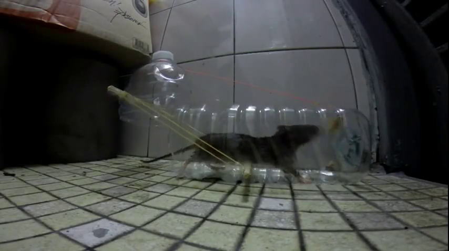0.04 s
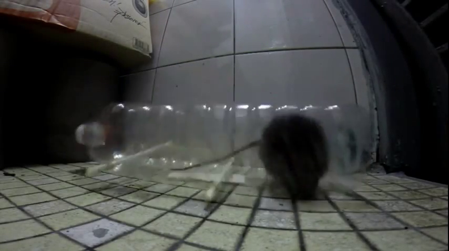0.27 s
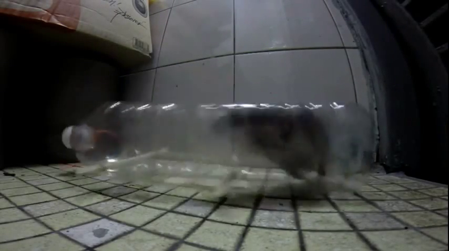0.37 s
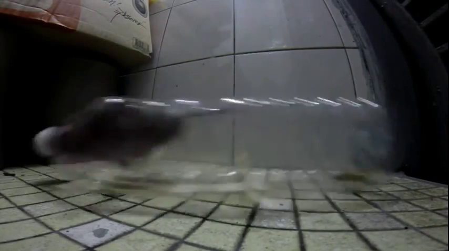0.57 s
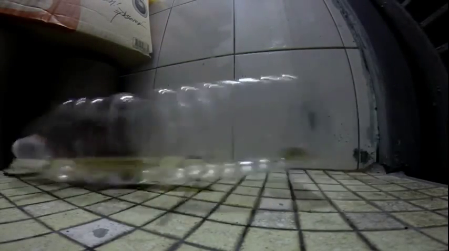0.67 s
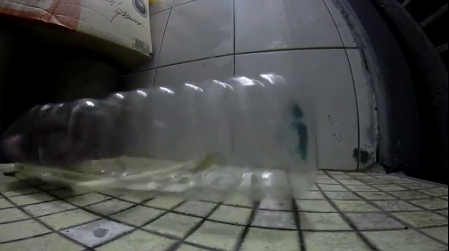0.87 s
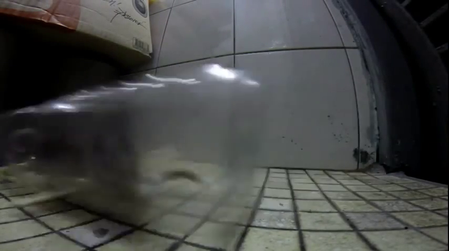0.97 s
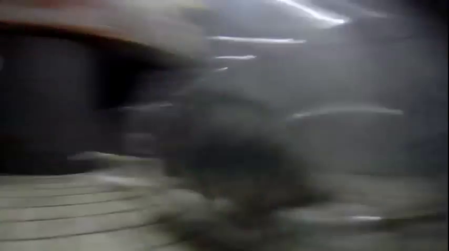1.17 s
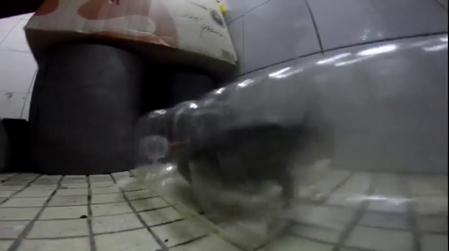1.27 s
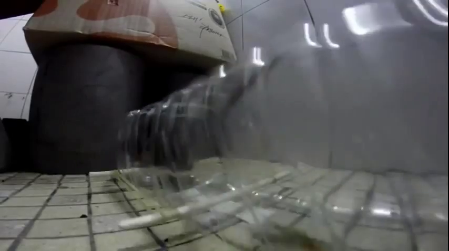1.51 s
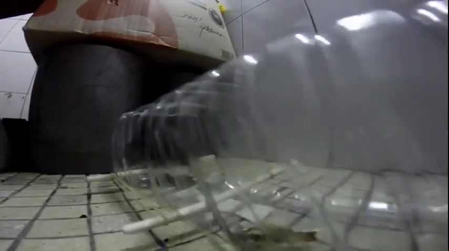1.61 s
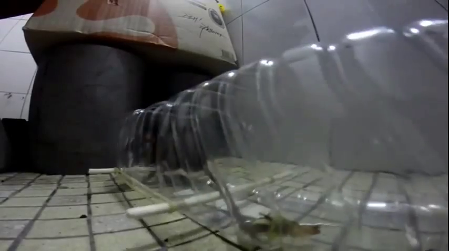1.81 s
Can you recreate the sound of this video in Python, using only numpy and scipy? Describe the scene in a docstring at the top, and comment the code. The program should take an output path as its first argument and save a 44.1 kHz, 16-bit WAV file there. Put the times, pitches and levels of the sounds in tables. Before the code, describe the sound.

A plastic bottle trap snaps shut, then knocks and crackles as a rat thrashes inside.

```python
"""Over a low drone and a faint whine, a plastic bottle trap slaps shut on a tiled floor.
The rat inside thrashes and rolls it: the thin wall knocks, buckles with sharp snaps and
crackles under the claws, while the bottle rings faintly and the small tiled room echoes.
At about 1.3 s the bottle skids with one squeak. The last knocks die away into a soft hiss
and a thin, high whine."""
import sys
import numpy as np
from scipy import signal
from scipy.fft import rfft, irfft, next_fast_len
from scipy.io import wavfile
from scipy.ndimage import map_coordinates

SR = 44100
rng = np.random.default_rng(int(sys.argv[2]) if len(sys.argv) > 2 else 0)


def materialize(psi):
    """Save the field psi as 16-bit PCM at rate SR to the path in sys.argv[1].

    A 1-D psi becomes a single channel; in a 2-D psi each row is a channel.
    """
    bounded = np.clip(np.atleast_2d(psi).T, -1, 1)
    quanta = np.round(bounded * 32767).astype(np.int16)
    wavfile.write(sys.argv[1], SR, quanta)


N = 81585
TIME = np.arange(N) / SR
TAIL = np.arange(SR // 3) / SR  # the clock for one short sound, in seconds

# The plastic has a low "body", a middle "crack" and a high "fizz". Each tone colour: f/Hz, level/dB
BODY = [(60, -37.5), (160, -23.5), (400, -11), (620, -3), (1000, -1), (1200, -3.5), (1450, -14.5),
        (2200, -40)]
CRACK = [(900, -15.5), (1500, -3.5), (2000, 1.5), (2700, -5), (3300, -4), (4000, -14), (6000, -36.5)]
FIZZ = [(2600, -29), (4000, 1.5), (6200, -6), (7200, -10.5), (10500, -19.5), (15000, -35)]
# The sharper fizz of a buckling panel: f/Hz, level/dB
SNAP_FIZZ = [(2600, -46), (4200, 9), (15000, -24)]
# The rumble of the hollow inside: f/Hz, level/dB
HOLLOW = [(30, -34), (70, -16.5), (150, -2), (225, 3), (335, -2.5), (450, -8), (700, -26.5)]
# Paws and sticks hit the wall: t/s, body level/dB, crack over body/dB, fizz over body/dB, panel f/Hz
KNOCKS = [(0.233, -18, -25, -18.5, 898), (0.2389, -16, -9, -26, 924), (0.295, -16, -8, -25, 954),
          (0.304, -16.5, -17, -12.5, 1035), (0.388, -23, -8, -23, 802), (0.416, -23, -5, -27, 927),
          (0.453, -19, -11, -16, 1028), (0.486, -42, 11.5, 8, 1248), (0.523, -21.5, -7.5, -23, 1117),
          (0.538, -31, -9, -29, 1090), (0.569, -23.5, -7, -22.5, 584), (0.644, -23.5, -10.5, -17, 923),
          (0.665, -21, -11, -8.5, 1167), (0.712, -20, -8.5, -15.5, 971), (0.755, -24.5, 0.5, -11.5, 918),
          (0.787, -21.5, -14, -33, 940), (0.817, -28.5, -7, -10, 733), (0.846, -24, -11, -13.5, 758),
          (0.857, -18.5, -8.5, -26, 1110), (0.907, -21.5, -10, -34, 692), (0.945, -33.5, 7.5, -21, 1047),
          (0.961, -26, -3.5, -17, 980), (1.018, -24, -11, -23, 942), (1.035, -44.5, 6, 6, 1130),
          (1.061, -23.5, -5, -36, 770), (1.112, -23.5, 1, -24, 900), (1.214, -13.5, -30, -28, 912),
          (1.233, -24, -3.5, -5, 1207), (1.272, -18, -10.5, -20, 1103), (1.503, -21, -8.5, -14.5, 905),
          (1.581, -22, -5.5, -22, 1118), (1.671, -42.5, 3.5, -22, 1005)]
# The wall buckles: t/s, body level/dB, crack over body/dB, fizz over body/dB, panel f/Hz,
# ping f/Hz, ping level/dB
SNAPS = [(0.2721, -15.5, 0, -10.5, 694, 3240, -3.5), (0.875, -19, -2.5, -21.5, 884, 2265, -10.5),
         (1.082, -21, -9.5, -41, 876, 1500, -6.5), (1.293, -10, -13.5, -21.5, 870, 1760, -10),
         (1.3061, -13.5, -8, -10.5, 545, 4685, -10.5), (1.4128, -13.5, -7, -12.5, 703, 4680, -11.5),
         (1.5451, -12.5, -5, -23, 1114, 2363, -6)]
# Fading notes, mostly heavy bumps of the bottle; the one at 1.546 s sounds with the last snap: t/s, f/Hz,
# level/dB, t60/s (t60 is the time to fade by 60 dB)
BUMPS = [(0.2405, 325, 0.5, 0.062), (0.273, 135, -5, 0.058), (.296, 336.5, -19.5, 0.31),
         (0.572, 70, -24.5, 0.094), (0.689, 210, -19.5, 0.16), (0.941, 317.5, -20.5, 0.22),
         (1.21, 244, -6, 0.048), (1.213, 92.5, -20, 0.11), (1.499, 63, -21, 0.074),
         (1.502, 328.6, -21.5, 0.21), (1.546, 651, -13, 0.058), (1.7203, 779, -11, 0.021),
         (1.721, 718, -27.5, 0.2)]
# How hard the rat scrabbles: t/s, wall level/dB, claw level/dB
SCRABBLE = [(.22, -36, -44), (.29, -24, -25), (.36, -28.5, -45), (.65, -35, -36.5), (.68, -19.5, -26.5),
            (.74, -32.5, -42), (.86, -31, -37), (.965, -27.5, -39.5), (.985, -57, -52),
            (1.05, -32.5, -42.5), (1.08, -23, -30.5), (1.2, -20, -28.5), (1.26, -36.5, -37.5),
            (1.41, -31, -34), (1.49, -26.5, -40), (1.65, -55.5, -44.5), (1.85, -61.5, -63)]
# The skid, with one slip per cycle: t/s, f/Hz, level/dB
SKID = [(1.324, 359, -27), (1.351, 406.9, -19), (1.371, 427.1, -18), (1.39, 432.5, -15),
        (1.412, 423, -21.5), (1.43, 391, -30.5), (1.47, 366, -30.5)]
# The tones inside the squeak: multiple of the slip rate, level/dB
SKID_TONES = [(1, 3), (2, 1), (3, -13), (3.6, -1.5), (5, -7)]
# The notes the bottle rings with: f/Hz, level/dB, t60/s
BOTTLE_NOTES = [(236.5, -14.5, 0.19), (322.5, -1, 0.11), (696, -10.5, 0.2), (1170, -10.5, 0.2),
                (2174, -9, 0.18)]
# How long the room echoes: f/Hz, t60/s
ROOM_DECAY = [(100, 0.45), (2000, 0.33), (12000, 0.52)]
# Tone colour of the steady room noise: f/Hz, level/dB
ROOM_NOISE = [(22, -14), (36, -4), (55, -12.5), (200, -10.5), (450, -20.5), (1050, -23.5), (2000, -37.5),
              (15000, -60.5)]
# Tone colour of the closing hiss: f/Hz, level/dB
HISS = [(2000, -24), (6000, 2), (10500, -0.5), (14000, -20)]


def amp(db):
    """Turn decibels into a number to multiply by."""
    return 10 ** (np.asarray(db) / 20)


def unit(x):
    """Scale a signal so that its average power is 1."""
    return x / np.sqrt(np.mean(x ** 2) + 1e-20)


def along(points, hz):
    """Read between the rows of a frequency table, on a log frequency scale."""
    freqs, values = np.transpose(points)
    return np.interp(np.log(hz + 1), np.log(freqs + 1), values)


def curves(rows):
    """Join the rows of a time table with straight lines, one curve per column."""
    times, *columns = np.transpose(rows)
    return [np.interp(TIME, times, column) for column in columns]


def wobble(rate):
    """A smooth curve through `rate` random values a second."""
    return map_coordinates(rng.standard_normal(4096), [TIME * rate], mode="wrap")


def add(out, start_s, x):
    """Mix x into out, beginning at start_s."""
    part = out[max(round(start_s * SR), 0):][:len(x)]
    part += x[:len(part)]


def colour(x, points, size=4096):
    """Filter x to a tone colour, fading out the treble above the table's last row."""
    hz = np.fft.rfftfreq(size, 1 / SR)
    gain = amp(along(points, hz)) / np.maximum(hz / points[-1][0], 1) ** 4
    # Folding the cepstrum (the log gain, transformed) keeps the filter from sounding before a hit.
    cepstrum = irfft(np.log(gain))
    cepstrum[1:size // 2] *= 2
    cepstrum[size // 2 + 1:] = 0
    response = irfft(np.exp(rfft(cepstrum)))
    return signal.fftconvolve(x, response)[:len(x)]


def note(hz, db, t60, attack_s):
    """One vibration that swells quickly and dies away."""
    return -amp(db - 60 * TAIL / t60) * np.sin(2 * np.pi * hz * TAIL) * (1 - np.exp(-TAIL / attack_s))


def blows(rows, fizz, t60, push, spiky_db, energy_s, rise_s):
    """Each blow is one push and a dying crinkle; the fizz builds as the contact slides."""
    out = np.zeros(N)
    for start, db, crack_db, fizz_db, *_ in rows:
        for spectrum, level in (BODY, db), (CRACK, db + crack_db), (fizz, db + fizz_db):
            noise, sizes = rng.standard_normal((2, len(TAIL)))
            force = noise * amp(spiky_db * sizes - 60 * TAIL / t60)
            force[0] += push * np.linalg.norm(force)
            if spectrum is fizz:
                force *= 1 - np.exp(-TAIL / rise_s)
            sound = colour(force, spectrum)
            # as much energy as a steady sound at this level lasting energy_s
            add(out, start, amp(level) * np.sqrt(energy_s * SR) * sound / np.linalg.norm(sound))
    return out


def knocks(t60=0.059, panel_over_body_db=7):
    """Every tap scuffs the wall and sounds the panel that it lands on."""
    out = amp(-0.5) * blows(KNOCKS, FIZZ, t60, push=0.19, spiky_db=5, energy_s=0.01, rise_s=0.00067)
    for start, db, _, _, panel_hz in KNOCKS:
        add(out, start, note(panel_hz, db + panel_over_body_db, t60, attack_s=0.0013))
    return out


def snaps(panel_over_body_db=9.5, attack_s=0.00086):
    """A panel pops through: a crack, the panel's own note and a high ping."""
    out = blows(SNAPS, SNAP_FIZZ, t60=0.026, push=0.27, spiky_db=3, energy_s=0.011, rise_s=0.00042)
    out *= amp(-0.5)
    for start, db, _, _, panel_hz, ping_hz, ping_db in SNAPS:
        panel = note(panel_hz, db + panel_over_body_db, t60=0.029, attack_s=attack_s)
        ping = note(ping_hz, ping_db, t60=0.017, attack_s=attack_s)
        add(out, start, panel + ping)
    return out


def bumps(attack_cycles=0.27):
    """Each row leaves one fading note: mostly bumps as the rat's weight throws the bottle about, and one the
    low note of the last snap."""
    out = np.zeros(N)
    for start, hz, db, t60 in BUMPS:
        add(out, start, note(hz, db, t60, attack_cycles / hz))
    return out


def crackle(spectrum, size_db, clump_db, rub, ticks_per_s=1500):
    """Tiny ticks of random size mix with rubbing noise and swell in clumps."""
    ticks = (rng.random(N) < ticks_per_s / SR) * rng.choice([-1, 1], N)
    sizes = amp(size_db * np.minimum(rng.exponential(size=N), 2))
    force = unit(ticks * sizes) + rub * rng.standard_normal(N)
    clumps = amp(clump_db * wobble(90))
    return unit(colour(force * clumps, spectrum))


def scrabble():
    """Claws scratch and tick on the wall while the bottle's ribs roll over the tiles."""
    wall_db, claw_db = curves(SCRABBLE)
    ticking = crackle(CRACK, size_db=4, clump_db=4, rub=0.24)
    scratching = amp(-8.5) * crackle(FIZZ, size_db=4, clump_db=3.5, rub=0.74)
    wall = crackle(BODY, size_db=7.5, clump_db=3.5, rub=0.76)
    rumble = amp(-4) * crackle(HOLLOW, size_db=3, clump_db=3, rub=0.66)
    fade_in = np.clip((TIME - SCRABBLE[0][0]) / 0.0025, 0, 1)
    return (amp(wall_db) * (wall + rumble) + amp(claw_db) * (ticking + scratching)) * fade_in


def skid(jitter=0.0297, flutter_db=3, rasp_db=-4, fade_s=0.008):
    """Plastic sticks and slips in a short squeak, with a rasp at every slip."""
    hz, db = curves(SKID)
    phase = 2 * np.pi * np.cumsum(hz * (1 + jitter * wobble(300))) / SR
    tone = sum(amp(level + flutter_db * wobble(120)) * np.sin(k * phase) for k, level in SKID_TONES)
    slips = rng.standard_normal(N) * (1 + np.cos(phase)) ** 2
    rasp = unit(colour(slips, BODY)) + amp(-13.5) * unit(colour(slips, CRACK))
    fade = np.clip(np.minimum(TIME - SKID[0][0], SKID[-1][0] - TIME) / fade_s, 0, 1)
    return (unit(tone) + amp(rasp_db) * rasp) * amp(db) * fade


def ringing(x, level_db=-22):
    """The bottle's own notes ring on after it is touched."""
    notes = sum(amp(db - 60 * TAIL / t60) * np.cos(2 * np.pi * hz * TAIL) for hz, db, t60 in BOTTLE_NOTES)
    return signal.fftconvolve(x, notes / np.linalg.norm(notes))[:N] * amp(level_db)


def room(x, level_db=-7.5, delay_s=0.005):
    """The tiled walls echo, and each frequency dies away at its own speed."""
    hz, t, noise = signal.stft(rng.standard_normal(SR // 2), SR, nperseg=256)
    decay = amp(-60 * t / along(ROOM_DECAY, hz)[:, None])
    echo = signal.istft(noise * decay, SR, nperseg=256)[1]
    out = np.zeros(N)
    add(out, delay_s, signal.fftconvolve(x, echo / np.linalg.norm(echo)))
    return amp(level_db) * out


def opening_hum(whine_hz=2934, shut_s=0.225, drone_hz=78.8, drone_s=0.4):
    """A faint electrical whine stops as the trap shuts; a low drone swells and fades."""
    overtones = sum(np.sin(2 * np.pi * k * whine_hz * TIME) for k in range(2, 6))
    drone = np.sin(2 * np.pi * drone_hz * TIME + 0.5 * wobble(17.2))
    swell = np.sin(np.pi * np.minimum(TIME / drone_s, 1))
    return amp(-72.5) * overtones * (TIME < shut_s) + amp(-40) * drone * swell


def closing_hiss(start_s=1.61, whine_hz=5512):
    """A soft hiss and a thin whine come in near the end."""
    hiss = amp(-58.5) * unit(colour(rng.standard_normal(N), HISS))
    whine = amp(-53.5) * np.sin(2 * np.pi * whine_hz * TIME)
    return (hiss + whine) * np.clip((TIME - start_s) / 0.012, 0, 1)


def background(noise_db=-42.5):
    """Low room noise runs all the way through, under the hum and the hiss."""
    return opening_hum() + closing_hiss() + amp(noise_db) * unit(colour(rng.standard_normal(N), ROOM_NOISE))


def scene(snap_echo_db=-6, bump_echo_db=-5):
    """Mix the bottle, the room and the background; snaps and bumps get less echo."""
    contacts = knocks() + scrabble() + skid()
    cracks, thuds = snaps(), bumps()
    bottle = contacts + cracks + thuds + ringing(contacts + cracks)
    into_room = contacts + amp(snap_echo_db) * cracks + amp(bump_echo_db) * thuds
    return (bottle + room(into_room) + background())[None]


def record(dry, ceiling=0.98, hardness=6, top_hz=15700):
    """Round off the loudest peaks, then remove everything above top_hz."""
    rounded = dry / (1 + np.abs(dry / ceiling) ** hardness) ** (1 / hardness)
    size = next_fast_len(N + 4096)
    in_band = np.fft.rfftfreq(size, 1 / SR) < top_hz
    return irfft(rfft(rounded, size) * in_band, size)[..., :N]


dry = scene()
out = record(dry)
materialize(out)
```